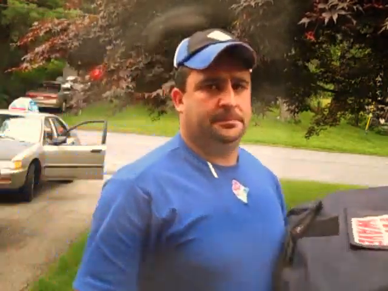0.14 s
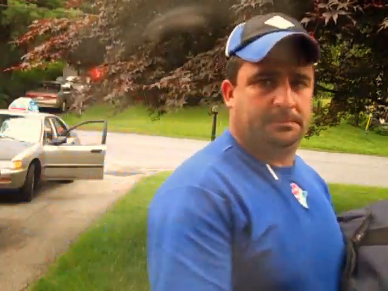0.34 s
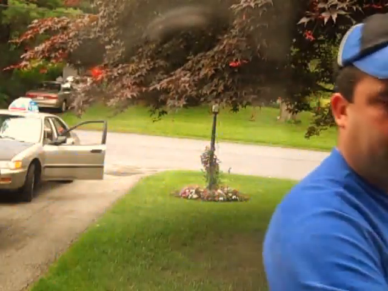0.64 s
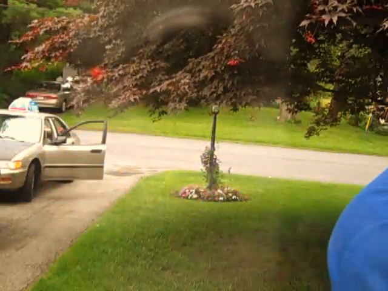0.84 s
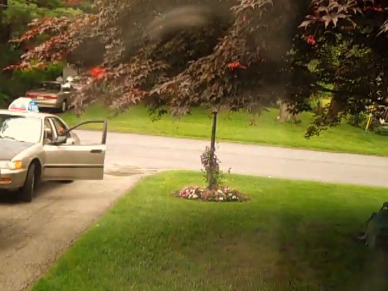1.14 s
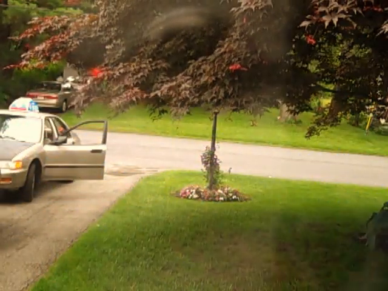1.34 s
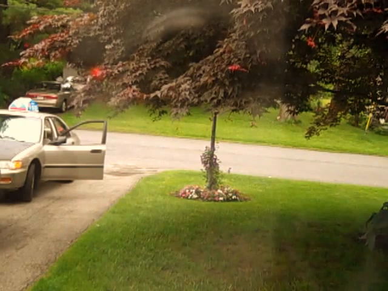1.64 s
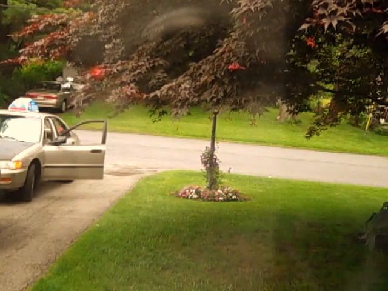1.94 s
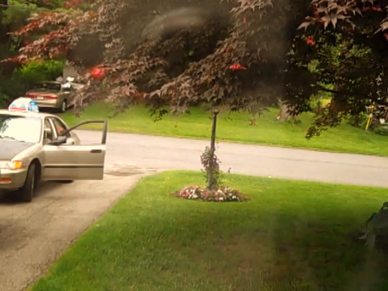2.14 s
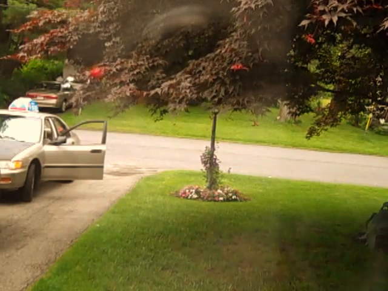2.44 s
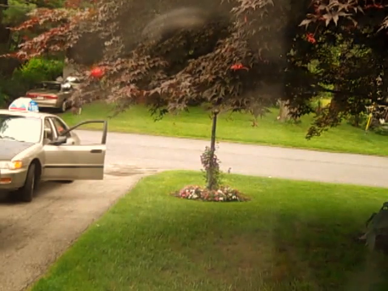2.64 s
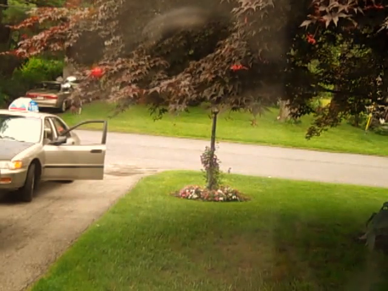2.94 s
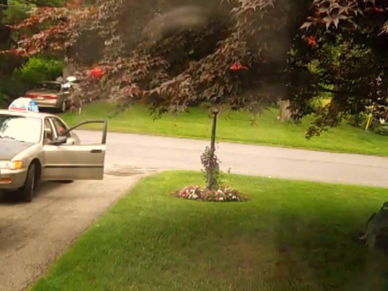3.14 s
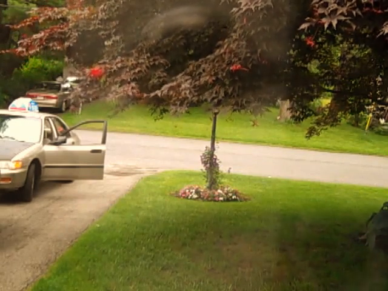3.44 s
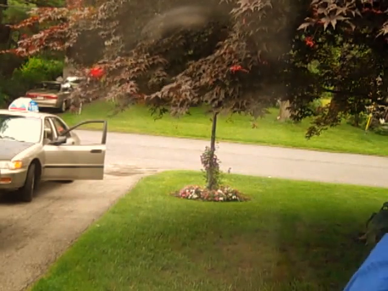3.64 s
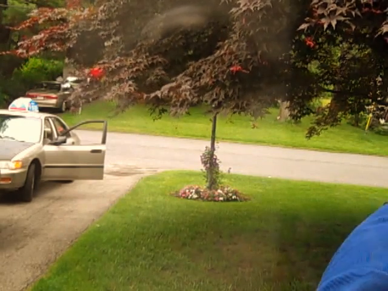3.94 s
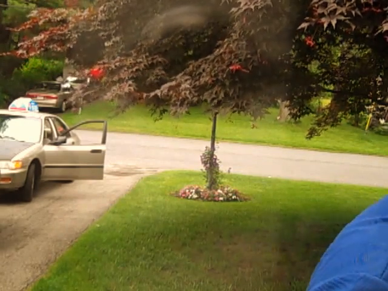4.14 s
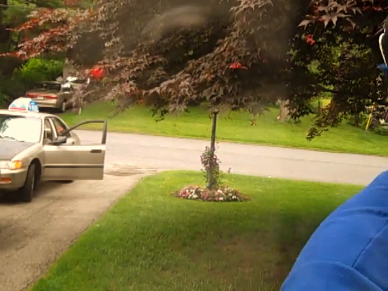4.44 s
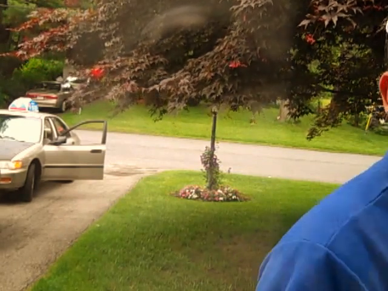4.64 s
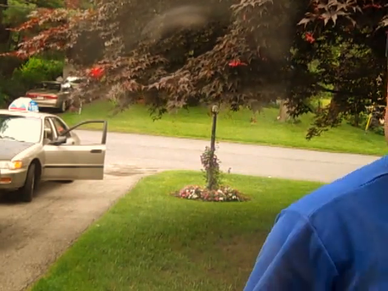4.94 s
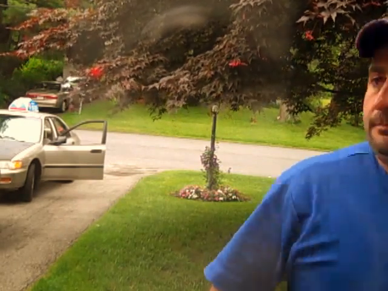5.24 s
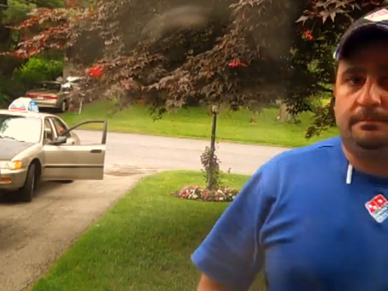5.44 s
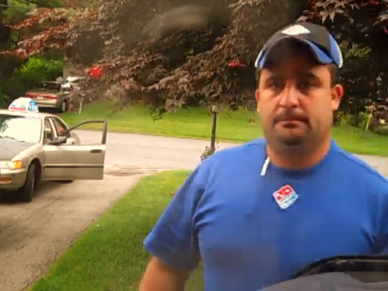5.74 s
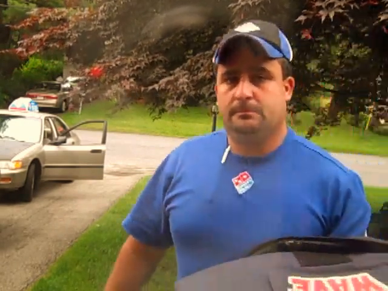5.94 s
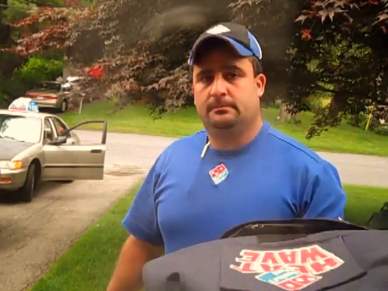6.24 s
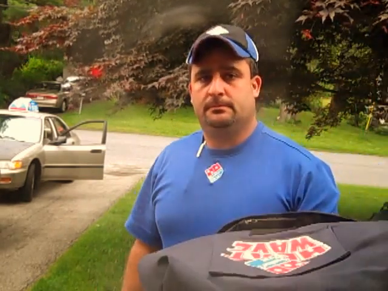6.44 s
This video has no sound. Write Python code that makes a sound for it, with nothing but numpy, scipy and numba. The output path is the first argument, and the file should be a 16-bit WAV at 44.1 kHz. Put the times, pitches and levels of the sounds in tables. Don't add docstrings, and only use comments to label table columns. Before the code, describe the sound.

Inside a humming hall, a light metal storm door bumps, unlatches, clatters and slams with a jingling chain, then five knuckle raps hit wood.

```python
import sys
import numpy as np
from scipy import signal
from scipy.fft import rfft, irfft, next_fast_len
from scipy.io import wavfile
from scipy.ndimage import uniform_filter1d, map_coordinates
from numba import njit

SR = 44100
rng = np.random.default_rng(int(sys.argv[2]) if len(sys.argv) > 2 else 0)


def amplitude_ratio(level_db):
    exponent = np.asarray(level_db, float) / 20
    return 10 ** exponent


def wav_out(sig):
    wavfile.write(sys.argv[1], SR, np.round(np.clip(np.atleast_2d(sig).T, -1, 1) * 32767).astype(np.int16))


N = 290442


def unit(x):
    return x / np.sqrt(np.mean(x ** 2) + 1e-20)


def along(points, hz):
    f, v = np.transpose(points)
    return np.interp(np.log(hz + 1), np.log(f + 1), v)


def filtered(x, response):
    n = x.shape[-1]
    m = next_fast_len(n + 8192)
    return irfft(rfft(x, m) * response(np.fft.rfftfreq(m, 1 / SR)), m)[..., :n]


def resonances(modes, f):
    return sum((-1) ** k * amplitude_ratio(db) * 1j * f * width / (hz * hz - f * f + 1j * f * width)
               for k, (hz, width, db) in enumerate(modes))


# (frequency [Hz], correlation)
LIKENESS = [(60, 1), (180, 0.92), (550, 0.88), (1650, 0.56), (4970, 0.065), (15000, -0.0047)]


def pair(n, gain):
    def response(hz):
        turn = np.arccos(np.clip(along(LIKENESS, hz), -1, 1)) / 2
        return gain(hz) * [np.cos(turn), np.sin(turn)]

    mid, side = filtered(rng.standard_normal((2, n)), response)
    return unit(np.array([mid + side, mid - side]))


def add(track, s, sound):
    i = round(s * SR)
    track[..., i:i + sound.shape[-1]] += sound[..., :N - i]


def fade(t, t60, rise_ms):
    return amplitude_ratio(-60 * t / t60) * (1 - np.exp(-t / (rise_ms / 1000 + 1e-5)))


def crackle(n, depth_db, size):
    return amplitude_ratio(depth_db * unit(uniform_filter1d(rng.standard_normal(n), size=size)))


def ringing(modes, scatter_db, fuzz, t):
    out = 0
    for hz, level_db, t60 in modes:
        strength = amplitude_ratio(level_db + rng.normal(0, scatter_db, (2, 1)) - 60 * t / t60)
        drift = np.cumsum(rng.normal(0, fuzz, (2, len(t))), axis=1) + 2 * np.pi * rng.random((2, 1))
        out = out + strength * np.sin(2 * np.pi * hz * t + drift)
    return out * (1 - np.exp(-t / 0.0007))


# (frequency [Hz], density [dB per Hz])
HALL_COLOUR = [(12, -46), (20, -5), (48, -14.5), (64, 0.5), (106, -7), (138, 2), (163, -15), (283, -18.5),
               (319, -22), (405, -16.5), (652, -26), (700, -23), (1180, -23), (1650, -27.5), (6000, -42),
               (7800, -64), (13200, -120)]
# (frequency [Hz], width [Hz], level [dB])
HUM_LINES = [(137.8, 21, -57.5), (429.4, 30, -72), (810, 120, -68.5), (1181.6, 41, -69)]


def hall():
    rumble_db, air_db, swells_per_s = -50.5, -68.5, 5
    swell = amplitude_ratio(1.8 * map_coordinates(rng.standard_normal(40), [np.arange(N) * swells_per_s / SR]))
    out = amplitude_ratio(rumble_db) * swell * pair(N, lambda f: amplitude_ratio(along(HALL_COLOUR, f)))
    for hz, width, db in HUM_LINES:
        out += amplitude_ratio(db) * pair(N, lambda f: resonances([(hz, width, 0)], f) ** 2)
    return out + amplitude_ratio(air_db) * pair(N, lambda f: f > 2500)


# (time [s], level [dB], frequency [Hz], t60 [s])
PANEL_BUMPS = [(0.211, -34.5, 300, 0.015), (.243, -38.5, 470, 0.031), (1.137, -25.5, 780, 0.089),
               (1.143, -25, 1497, 0.049), (1.362, -33, 2546, 0.077), (1.362, -33.5, 3160, 0.09),
               (1.381, -29, 385, 0.079), (1.44, -12, 433, 0.028), (1.463, -17.5, 2040, 0.046),
               (1.464, -24, 1303, 0.066), (1.464, -28.5, 3800, 0.072), (1.515, -13, 53.4, 0.2),
               (1.577, -38, 412, 0.064), (1.705, -42, 726, 0.12), (2.331, -26.5, 506, 0.092),
               (2.364, -25, 440, 0.074), (2.631, -14, 129, .2), (2.638, -23.5, 54, 0.5),
               (2.678, -36, 1610, 0.067), (2.706, -27.5, 880, 0.092), (2.752, -18, 797, 0.064),
               (2.753, -39.5, 3250, .2), (2.903, -41, 1540, 0.086), (3.135, -47, 13000, .13),
               (3.135, -23.5, 1750, 0.032), (3.191, -40.5, 856, 0.079), (3.225, -51, 1250, .06),
               (3.143, -27, 598, 0.1), (3.138, -28.5, 1174, .08), (3.3991, -37, 376, 0.11),
               (5.712, -46.5, 470, 0.062)]
# (time [s], level [dB], frequency [Hz], t60 [s], rise [ms])
FLEX_GROAN = (1.234, -9, 369, 0.145, 24)
# (frequency [Hz], level [dB], t60 [s])
SLAM_MODES = [(65.4, -16.5, 0.3), (122.5, -12.5, .1), (196, -12.5, .06), (271, -8, 0.05), (398, 2, 0.042),
              (810, -6, 0.03), (1114, -10.5, 0.032), (1310, -6.5, .033), (1560, -11, 0.02)]
# (peak time [s], boom level [dB], rattle level [dB], build-up [s])
DOOR_JOLTS = [(1.149, -30, -29, 0.03), (1.239, -43, -31, 0.03), (1.368, -38.5, -40, 0.013),
              (1.444, -25.5, -31, 0.034), (1.468, -25, -26, 0.0099), (1.517, -30.5, -28.5, 0.014),
              (1.57, -30.5, -43.5, 0.024), (1.634, -41.5, -39.5, 0.01), (1.705, -41.5, -44, .008),
              (1.77, -48.5, -45.5, .01), (1.82, -51, -49, 0.018), (1.9, -47.5, -57, 0.069),
              (2.072, -47.5, -54, 0.025), (2.332, -35, -30, 0.013), (2.376, -28.5, -31.5, 0.067),
              (2.43, -40, -42.5, .04), (2.51, -48.5, -41, 0.0061), (2.608, -15.5, -15, 0.0051),
              (2.655, -20.5, -33, 0.033), (2.71, -19, -33.5, 0.027), (2.753, -22.5, -25.5, 0.009),
              (3.02, -40.5, -51.5, 0.054), (3.089, -37, -37, 0.086), (3.144, -40, -34, 0.012),
              (3.3, -44, -50, 0.15), (3.4, -39, -42, .012), (4.634, -33.5, -48, 0.013),
              (4.752, -43, -48.5, 0.088)]
# (frequency [Hz], density [dB per Hz])
BOOM_COLOUR = [(15, -29), (30, -6), (55, -3), (95, 1.5), (130, -1), (180, -11), (300, -47.5)]
# (frequency [Hz], width [Hz], level [dB])
PANEL_MODES = [(281.3, 59, -4.5), (367.2, 72.4, 0.5), (417.3, 67, 0.5), (490, 97, -1.5), (578, 202, -6.5)]
# (frequency [Hz], level [dB])
SCUFF_COLOUR = [(100, -58.5), (200, -19), (700, -19.5), (1400, -27.5), (2600, -35), (6000, -57)]


def panels():
    bump_rise_ms, slam_s, slam_rise_ms = 1.2, 2.6064, 0.7
    build_db, boom_t60_s, rattle_t60_s = 18, 0.53, 0.2
    linger_db, linger_t60_s = -20, 1
    out, t = np.zeros((2, N)), np.arange(SR // 2) / SR
    notes = [(*row, bump_rise_ms) for row in PANEL_BUMPS]
    notes += [(slam_s, db, hz, t60, slam_rise_ms) for hz, db, t60 in SLAM_MODES]
    notes += [FLEX_GROAN]
    for s, db, hz, t60, rise_ms in notes:
        add(out, s, amplitude_ratio(db) * fade(t, t60, rise_ms) * np.sin(2 * np.pi * hz * t))

    boom_power, rattle_power = np.zeros(N), np.zeros(N)
    after = np.arange(-SR // 4, SR) / SR
    for s, boom_db, rattle_db, build_s in DOOR_JOLTS:
        def swell(t60):
            return amplitude_ratio(np.where(after < 0, build_db * after / build_s, -60 * after / t60))

        rattling = swell(rattle_t60_s) + amplitude_ratio(linger_db) * swell(linger_t60_s)
        add(boom_power, s + after[0], (amplitude_ratio(boom_db) * swell(boom_t60_s)) ** 2)
        add(rattle_power, s + after[0], (amplitude_ratio(rattle_db) * rattling) ** 2)
    rattle_power *= crackle(N, 6.9, 90)
    boom = pair(N, lambda f: amplitude_ratio(along(BOOM_COLOUR, f)))
    rattle = pair(N, lambda f: resonances(PANEL_MODES, f) ** 2 + amplitude_ratio(along(SCUFF_COLOUR, f)))
    return out + np.sqrt(boom_power) * boom + np.sqrt(rattle_power) * rattle


# (time [s], peak level [dB], dull part [dB], strongest patch [Hz])
LATCH_TICKS = [(0.645, -34, -14, 8150), (0.7898, -46, -6, 6700), (1.137, -24.5, 2.5, 8900),
               (1.1469, -21, -35, 8150), (1.2337, -16, 3, 7800), (1.2528, -21.5, -19, 7460),
               (1.418, -20, -5, 8500), (1.4377, -21, -3.5, 6100), (1.4412, -9.5, -7.5, 6360),
               (1.6995, -25.5, -9.5, 6700), (2.4156, -32.5, -4.5, 8260), (2.5114, -41, 2, 8100),
               (3.033, -36.5, 6.5, 6100), (3.0768, -25.5, 0.5, 7550), (3.131, -30, -5.5, 6800),
               (3.1339, -11.5, -3.5, 6400), (3.1365, -8, -5.5, 6600), (3.1464, -22.5, -12, 6160),
               (3.2252, -33, 2, 6550), (3.265, -29, -4, 8300), (3.3436, -31.5, -2.5, 8200),
               (3.425, -36, 0, 8200), (3.469, -31.5, -4, 8500), (4.425, -42, -2, 8330)]
# (time [s], peak level [dB], dull part [dB], strongest patch [Hz])
FRAME_KNOCKS = [(1.0898, -48, 6.5, 2520), (1.2194, -24, -2, 3060), (1.2955, -29, -3.5, 3400),
                (1.3617, -22, -1, 3130), (1.4624, -10, -3, 2020), (1.479, -24.5, -2.5, 2040),
                (2.3295, -42, 14.5, 2060), (2.366, -31, 4, 2900), (2.587, -48, 10, 1900),
                (2.6054, -32, 15, 2660), (2.6325, -6.5, -9, 2030), (2.6446, -15.5, -17, 3790),
                (2.7513, -12, 4.5, 2040), (2.767, -18, -26, 3320), (2.9823, -49, 10, 3050),
                (3.403, -52.5, 14.5, 2370), (4.6264, -54, 10, 2545)]
# (frequency [Hz], width [Hz], level [dB])
LATCH_MODES = [(3000, 37, -12), (3710, 15, 3.5), (5060, 12, -14), (6360, 320, 1.5), (6600, 33, -5),
               (6700, 130, -2.5), (7490, 78, -20), (8150, 100, 4.5), (8580, 74, -9), (12770, 53, -20.5)]
# (frequency [Hz], width [Hz], level [dB])
FRAME_MODES = [(1190, 23, -13), (1557, 92, -5), (2020, 45, -19), (2520, 55, -8), (3130, 150, -11.5),
               (3790, 310, -4), (5030, 8.3, 1), (5240, 190, -25)]
# (time [s], level [dB])
STRIP_TWANGS = [
    (1.141, -45),
    (1.235, -41.5),
    (1.463, -37.5),
    (2.632, -35.5),
    (2.752, -37),
    (3.137, -38),
]
# (frequency [Hz], level [dB], t60 [s])
STRIP_MODES = [(1010, 2, 0.28), (1200, -2.5, 0.14), (1337, -4.5, 0.29), (1605, -3, 0.54), (2040, -1, 0.097),
               (2260, -8, 0.091), (3250, -7, 0.46), (4600, -11.5, 0.18)]


def clacks():
    tick_tilt_db, knock_tilt_db = 2.5, -1
    hard_t60_s, soft_below_db, drag_s_per_db = 0.13, -30, 0.01
    out, t = np.zeros((2, N)), np.arange(SR // 4) / SR
    contacts = [(*row, tick_tilt_db) for row in LATCH_TICKS]
    contacts += [(*row, knock_tilt_db) for row in FRAME_KNOCKS]
    for s, db, dull_db, patch_hz, tilt_db in contacts:
        modes = [(hz, 1.1 * width + 45, level + 5.5 + rng.normal(0, 3)) for hz, width, level in LATCH_MODES]
        modes += [(patch_hz, 0.14 * patch_hz, 7)]

        def bright_colour(f):
            slope_db = along([(1200, -25.5), (2800, 1.0), (9000, -11.0), (15000, -6)], f)
            return (1 + resonances(modes, f)) * amplitude_ratio(slope_db + tilt_db * np.log2(f / 5500 + 0.01))

        def dull_colour(f):
            slope_db = along([(350, -25.5), (950, 7), (2300, 0.5), (4000, -15.0)], f)
            return (0.15 + resonances(FRAME_MODES, f)) * amplitude_ratio(slope_db)

        bright, dull = pair(len(t), bright_colour), pair(len(t), dull_colour)
        softness_db = max(soft_below_db - db - max(dull_db, 0) / 2, 0)
        t60 = np.clip(hard_t60_s + drag_s_per_db * softness_db, 0.02, 0.4)
        shape = fade(t, t60, 1.0) + 1.2 * amplitude_ratio(-60 * t / 0.0035) + 0.51 * fade(t, 0.03, 0.6)
        loose = 1.8 * unit(uniform_filter1d(rng.standard_normal(len(t)), size=130))
        chatter = amplitude_ratio(loose * np.clip(t / 0.0088, 0, 1))
        add(out, s, amplitude_ratio(db - 11.5) * (bright + amplitude_ratio(dull_db) * dull) * shape * chatter)
    for s, db in STRIP_TWANGS:
        add(out, s, amplitude_ratio(db) * ringing(STRIP_MODES, 5.2, 0.058, t))
    return out


# (time [s], peak level [dB])
CHAIN_JINGLES = [
    (1.5477, -34),
    (1.6313, -33),
    (1.7066, -38.5),
    (1.7654, -45),
    (1.8124, -49),
    (2.7196, -28),
    (2.756, -31),
]
# (frequency [Hz], level [dB], t60 [s])
LINK_MODES = [(4720, -5, .12), (4870, 0, .13), (5010, 0, .14), (5180, -2, .11), (5330, -8, .07),
              (6920, -3, .11), (7430, -5, .13), (7660, -11, .13), (7880, -10, .11), (8680, -4, .11),
              (8940, -11, .08), (9860, -12, .08), (12100, -22, .06)]


def chain():
    out, t = np.zeros((2, N)), np.arange(SR // 4) / SR
    for s, db in CHAIN_JINGLES:
        blur = pair(len(t), lambda f: amplitude_ratio(along([(3000, -7.0), (5000, -11), (10000, -4.0), (14000, -11.5)], f)))
        blur *= fade(t, 0.22, 0.5) + 2.2 * amplitude_ratio(-60 * t / 0.013)
        add(out, s, amplitude_ratio(db - 5.5) * (ringing(LINK_MODES, 1.5, 0.1, t) + 0.53 * blur))
    return out


# (start [s], length [s], level [dB], treble tilt [dB per octave])
RUB_STROKES = [
    (1.702, 0.79, -63, -5.5),
    (2.796, 0.19, -58, -7),
    (2.324, 0.1, -41, -8),
    (2.385, 0.076, -50, 2),
    (6.194, 0.024, -59, 2),
    (6.203, 0.057, -56.5, 2.5),
    (6.224, 0.037, -56, 1),
]


def rubs():
    out = np.zeros((2, N))
    for s, length_s, db, tilt_db in RUB_STROKES:
        n = round(length_s * SR)
        grain = crackle(n, 2.7, 60)
        noise = pair(n, lambda f: amplitude_ratio(tilt_db * np.log2(np.clip(f, 600, 8000) / 4000)) * (f > 500))
        stroke = np.sin(np.pi * np.arange(n) / n) ** 0.21
        add(out, s, amplitude_ratio(db) * noise * grain * stroke)
    return out


# (time [s], blow level [dB], contact [ms], snap level [dB])
KNUCKLE_RAPS = [
    (3.7663, 11.5, 1.67, -32),
    (3.9621, 16.5, 1.47, -28.5),
    (4.1469, 14, 1.455, -30),
    (4.3102, 13.5, 1.215, -28),
    (4.4811, 15, 1.45, -28),
]
# (frequency [Hz], level [dB], t60 [s], sign of mode shape under the knuckle)
DOOR_MODES = [(42, -34.9, 0.6, -1), (57, -34.9, 0.6, -1), (77, -32.9, 0.6, -1), (87, -10.7, 0.071, -1),
              (95, -29.3, 0.6, 1), (104, -23.5, 0.162, 1), (123, -28.8, 0.507, 1), (127, -24.8, 0.273, 1),
              (163, -10.0, 0.03, 1), (199, -27, 0.15, -1), (227, -32.6, 0.129, 1), (238, -44.8, 0.286, -1),
              (285, -21.8, 0.123, 1), (288, -17.0, 0.038, -1), (297, -21.4, 0.092, 1),
              (357, -32.5, 0.234, -1), (366, -25, 0.12, 1), (405, -8.7, 0.043, 1), (444, -26.8, 0.186, -1),
              (484, -25.1, 0.134, 1), (525, -34.8, 0.171, -1), (612, -26.1, 0.135, -1),
              (701, -26.2, 0.124, 1), (760, -20.3, 0.068, 1), (866, -20.4, 0.124, 1)]
# (frequency [Hz], t60 [s])
HALL_T60 = [(300, 0.13), (800, 0.16), (3000, 0.11), (8000, 0.085), (14000, 0.06)]


def raps():
    echo_s, echo_db = 0.029, -14
    stairs_db, stairs_t60_s = -16.5, 0.25
    snap_colour = [(150, -20), (300, 3.0), (600, 9.5), (1200, -5.5), (3000, -15.0), (9000, -15.5), (15000, -21.0)]
    linger_colour = [(120, 2), (250, 5.0), (700, -11.5), (1600, -31), (3000, -47.0)]
    out, t = np.zeros((2, N)), np.arange(SR // 2) / SR
    for s, db, contact_ms, snap_db in KNUCKLE_RAPS:
        push = np.sin(np.pi * np.clip(t[:200] * 1000 / contact_ms, 0, 1))
        spot_db = rng.normal(0, 1.0, (len(DOOR_MODES), 1)) + rng.normal(0, 0.55, (len(DOOR_MODES), 2))
        ring = sum(sign * amplitude_ratio(level + d[:, None] - 60 * t / t60) * np.sin(2 * np.pi * hz * t)
                   for (hz, level, t60, sign), d in zip(DOOR_MODES, spot_db))
        wood = signal.fftconvolve(ring, push[None] / push.sum(), axes=1)[:, :len(t)]
        late = np.pad(wood, ((0, 0), (round(echo_s * SR), 0)))[:, :len(t)]
        wood += amplitude_ratio(echo_db) * filtered(late, lambda f: resonances([(426, 380, 0)], f))

        snap = pair(len(t), lambda hz: amplitude_ratio(along(snap_colour, hz)))
        hz, frame_s, z = signal.stft(snap, SR, nperseg=128)
        hall_tail = amplitude_ratio(-60 * frame_s / along(HALL_T60, hz)[:, None])
        stairs_tail = amplitude_ratio(stairs_db - 60 * frame_s / stairs_t60_s) * (hz > 1500)[:, None]
        snap = signal.istft(z * (hall_tail + stairs_tail), SR, nperseg=128)[1][:, :len(t)]
        snap *= 1 - np.exp(-t / 0.0017)

        linger = pair(len(t), lambda hz: amplitude_ratio(along(linger_colour, hz)))
        wood += amplitude_ratio(-48.0) * linger * fade(t, 0.7, 22.7)
        add(out, s, amplitude_ratio(db) * (wood + amplitude_ratio(snap_db) * snap))
    return out


def scene():
    return hall() + panels() + clacks() + chain() + rubs() + raps()


def causal(gain):
    ceps = irfft(np.log(gain))
    half = ceps.shape[-1] // 2
    ceps[..., 1:half] *= 2
    ceps[..., half + 1:] = 0
    return np.exp(rfft(ceps))


# (resonance [Hz], width [Hz], roll-off [Hz])
MIC_PORTS = [
    (8070, 1790, 7100),
    (6670, 1160, 6740),
]
# (frequency [Hz], level [dB])
BODY_SHADING = [(3000, 0), (3800, 3.5), (4500, 2), (5400, -1.5), (6300, -0.4), (7000, 0), (8000, -0.5)]
# (frequency [Hz], level [dB])
LEFT_RIGHT = [(25, -4.5), (60, -3), (200, 1.8), (700, 1), (1300, 0.5), (4000, 2.5)]


def microphones(dry):
    left_lag_s = 0.00008

    def response(f):
        port = np.array([c * c / (c * c - f * f + 1j * f * w) * (1 + 1j * f / (1.83 * c)) / (1 + 1j * f / top)
                         for c, w, top in MIC_PORTS])
        body = causal(amplitude_ratio(along(BODY_SHADING, f) + along(LEFT_RIGHT, f) * [[0.5], [-0.5]]))
        return port * body * np.exp(-1j * np.pi * f * left_lag_s * np.array([[1], [-1]]))

    return filtered(dry, response)


@njit
def ducking(peak, limit, attack, hold, release, lag):
    gain, goal, g, wait = np.zeros(len(peak)), 0., 0., 0.
    for i in range(len(peak)):
        over = min(peak[i] * 10 ** (g / 20) / limit - 1, 1.)
        if over > 0:
            goal, wait = goal - attack * over, hold
        elif wait > 0:
            wait -= 1
        else:
            goal = min(goal + release, 0.)
        g += (goal - g) / lag
        gain[i] = g
    return gain


# (time [s], length [ms])
OVERFLOWS = [
    (3.7747, .75),
    (3.971, .4),
]


def overload(x):
    limit, attack_db_s, hold_s, release_db_s, lag_s = 0.39, 1900, 0.23, 58, 0.017
    peak = np.abs(x).max(0)
    x = x * amplitude_ratio(ducking(peak, limit, attack_db_s / SR, hold_s * SR, release_db_s / SR, lag_s * SR))
    x = x / (1 + np.abs(x / 0.5) ** 14) ** (1 / 14)
    for s, ms in OVERFLOWS:
        x[0, round(s * SR):round((s + ms / 1000) * SR)] = -0.46
    return x


def roll_off(x):
    return signal.sosfilt(signal.butter(12, 16620, fs=SR, output="sos"), x)


def record(dry):
    hiss_db = -70.5
    x = microphones(dry) + amplitude_ratio(hiss_db) * rng.standard_normal((2, N))
    return roll_off(overload(x))


dry = scene()
out = record(dry)
wav_out(out)
```